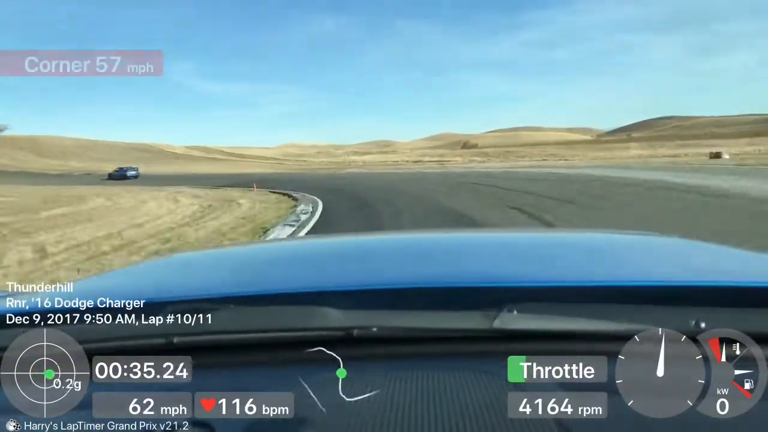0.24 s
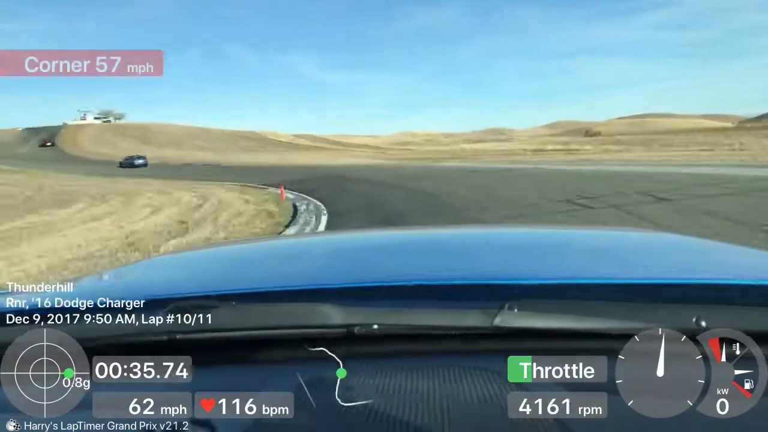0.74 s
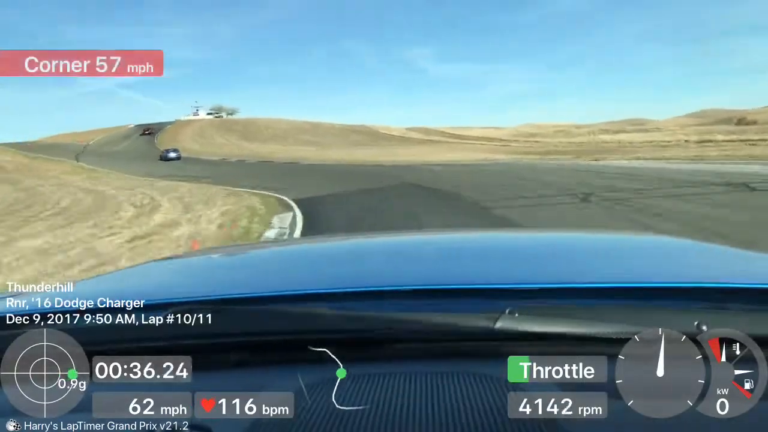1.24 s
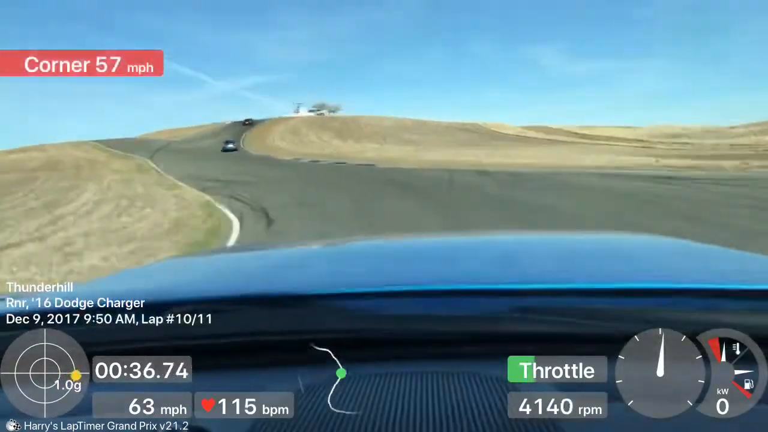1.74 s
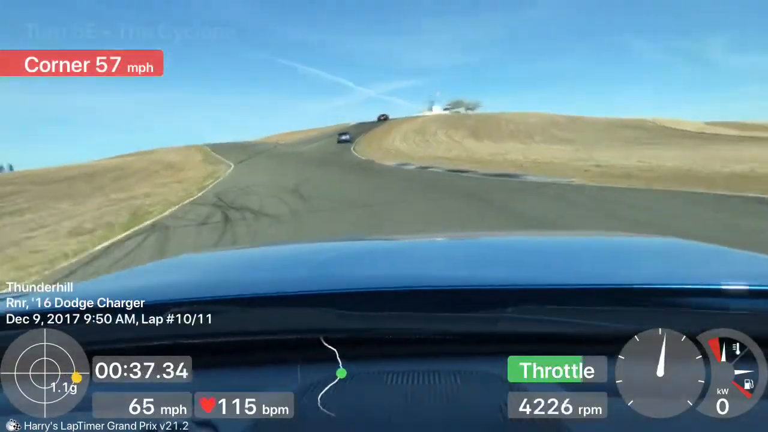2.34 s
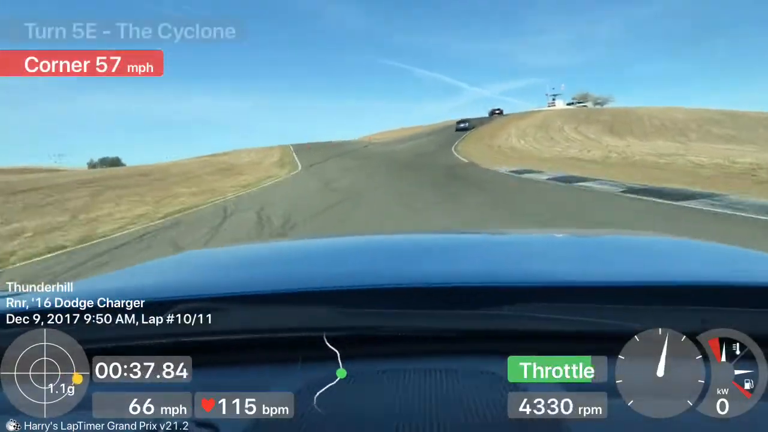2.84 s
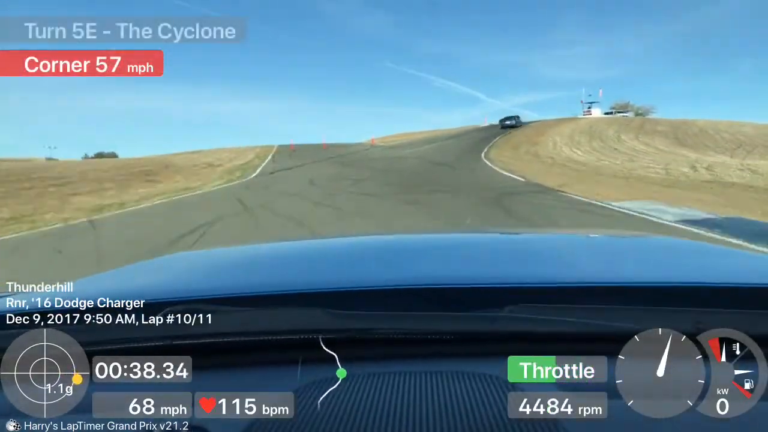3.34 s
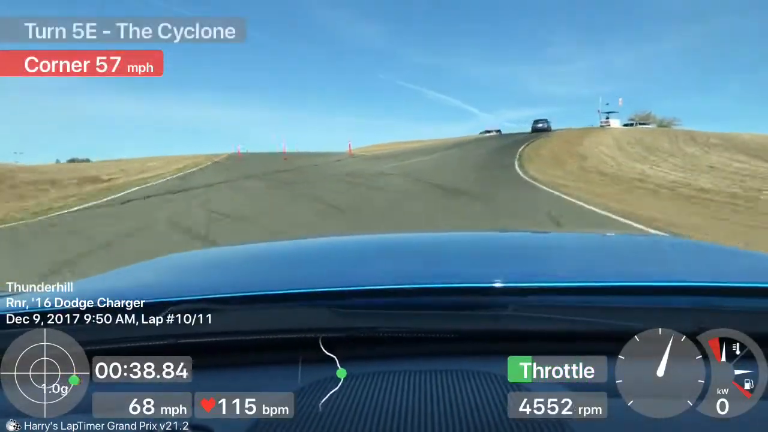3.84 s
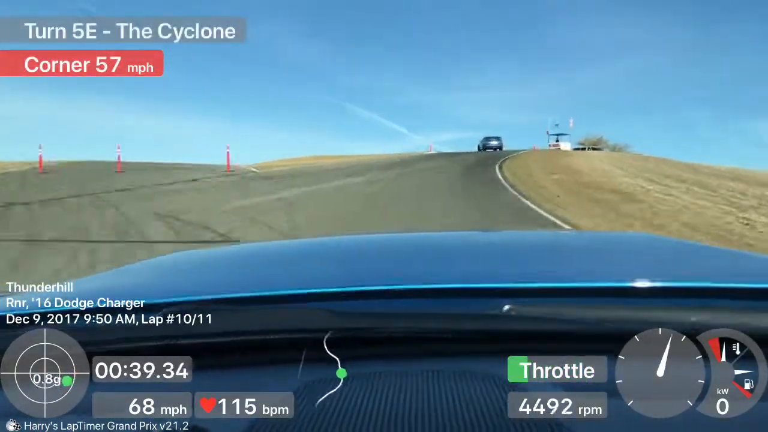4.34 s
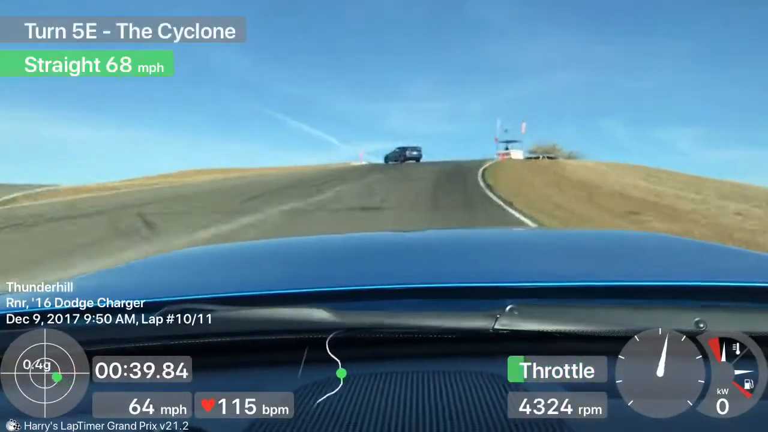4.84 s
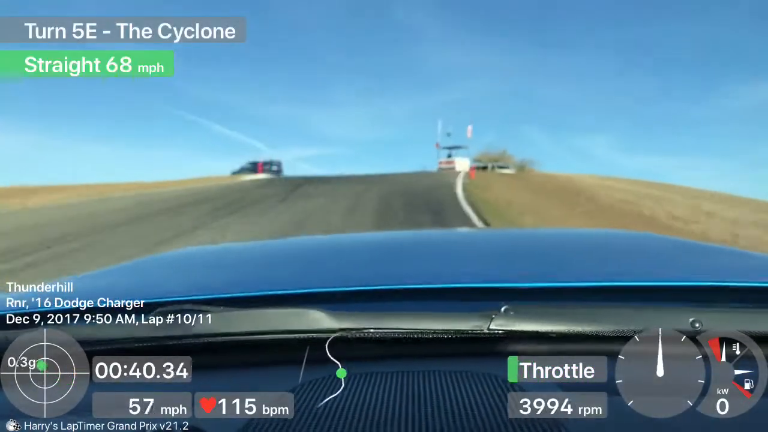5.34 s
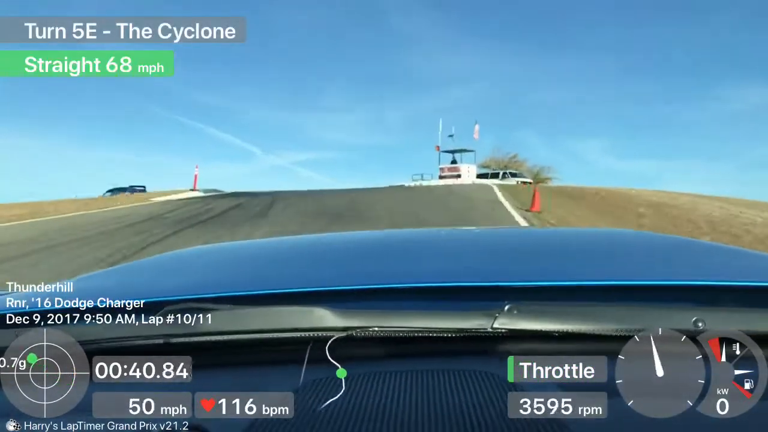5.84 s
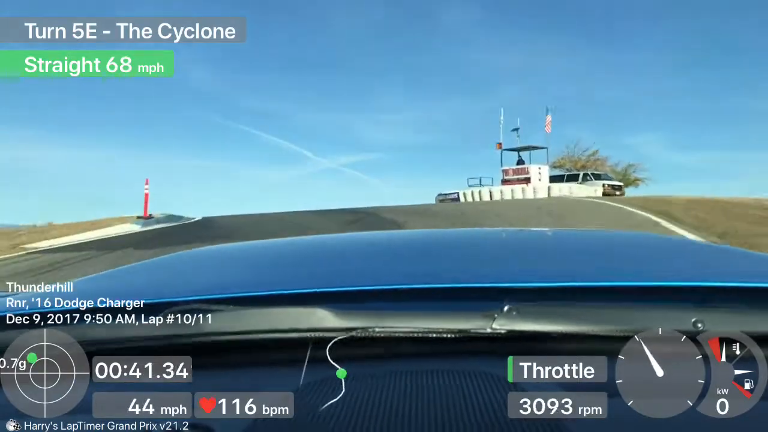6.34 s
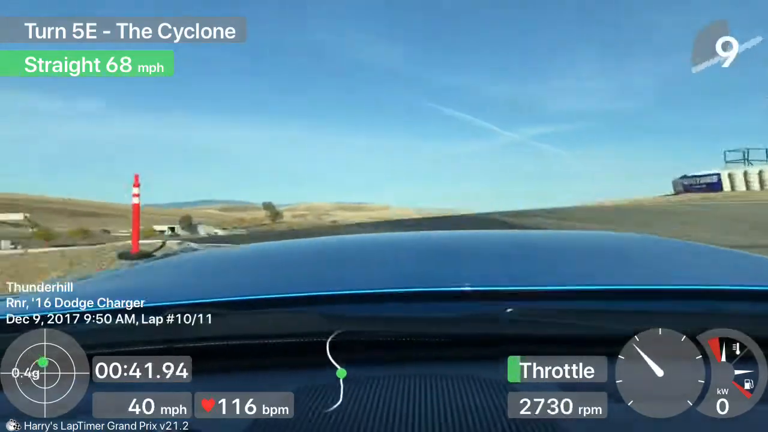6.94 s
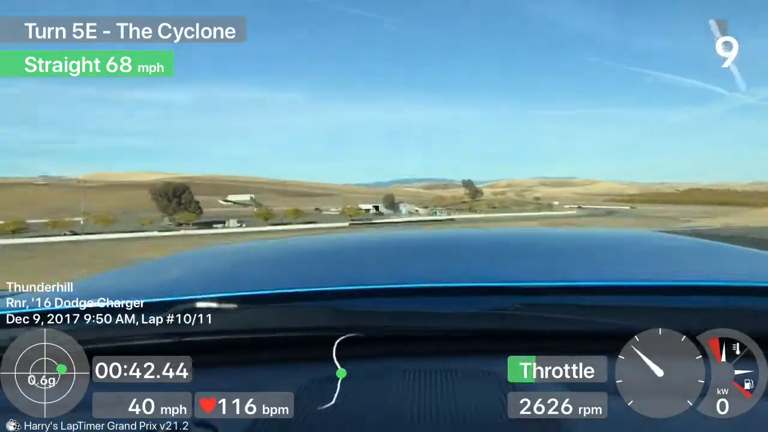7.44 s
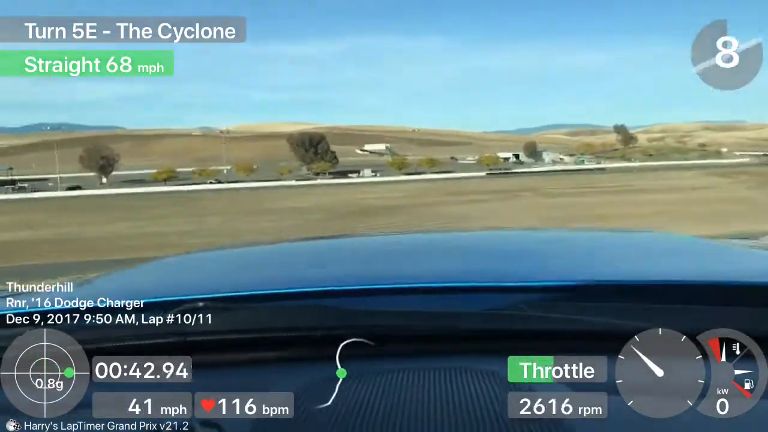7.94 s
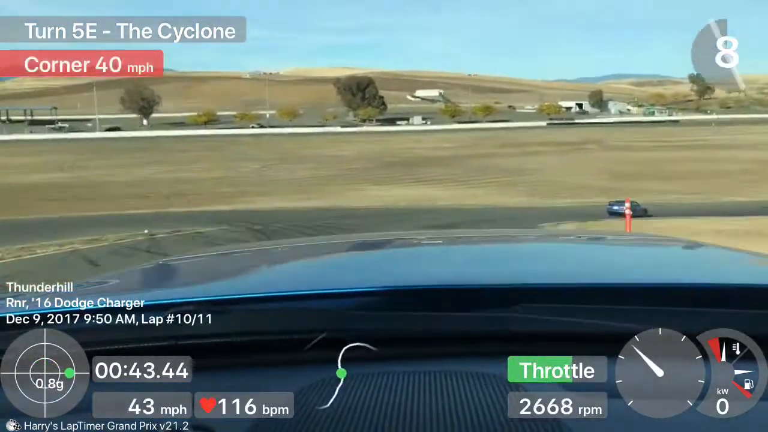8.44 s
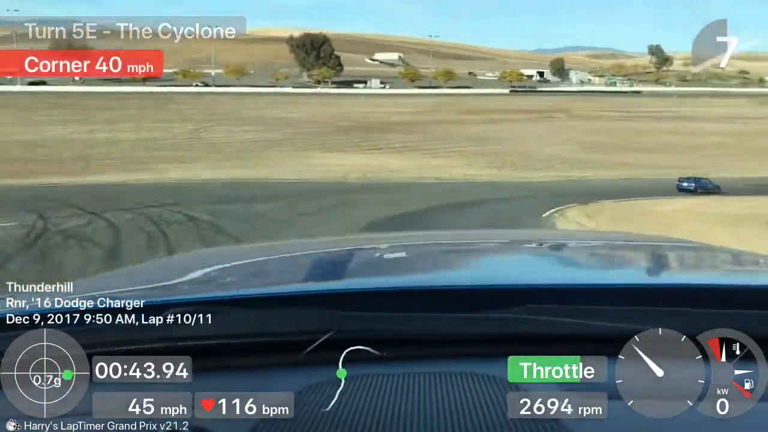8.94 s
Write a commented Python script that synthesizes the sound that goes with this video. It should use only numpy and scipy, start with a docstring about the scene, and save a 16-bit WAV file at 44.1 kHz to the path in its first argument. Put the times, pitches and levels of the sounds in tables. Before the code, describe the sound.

Inside a powerful car cornering hard, the engine booms over road rumble, drops in pitch as the tyres squeal, then pulls again.

```python
"""A supercharged V8 on a race track, from one microphone in the cabin, behind the windscreen.
The car holds speed through a long bend, exhaust barking, rotors whining, tyres scrubbing sideways,
and pulls uphill. At 5 s it brakes: the tread sticks and slips in a squeal, and the body knocks.
From 6 s it takes a slow corner, tyres chirping, the firing pulses booming in the cabin's air modes.
Road rumble and wind surround the microphone throughout; now and then loose plastic trim clicks."""
import sys
import numpy as np
from scipy import signal
from scipy.fft import rfft, irfft, next_fast_len
from scipy.io import wavfile

SR = 44100
rng = np.random.default_rng(int(sys.argv[2]) if len(sys.argv) > 2 else 0)


def dump_mix(stems):
    """Bounce the given channels to the path in sys.argv[1] as a 16-bit WAV at rate SR."""
    frames = np.atleast_2d(stems).T  # one column per channel
    limited = np.clip(frames, -1, 1)  # hard clip at full scale
    pcm = np.round(limited * 32767).astype(np.int16)
    wavfile.write(sys.argv[1], SR, pcm)


N = 405279
TIME = np.arange(N) / SR

# revs, and road speed too, as the car stays in one gear: (time [s], crank speed [turns/s])
REVS = [(0, 68.8), (1.9, 68.9), (2.35, 71.9), (2.96, 77.4), (3.15, 77.6), (3.42, 75.2), (4.5, 74.0),
        (4.8, 72.7), (5.3, 63.2), (5.57, 54.9), (6.0, 49.7), (6.3, 45.4), (6.95, 41.6), (7.2, 43.9),
        (7.5, 43.6), (7.77, 44.8), (7.86, 43.3), (7.95, 44.6), (8.07, 44.2), (8.18, 46.7), (8.55, 46.9),
        (8.7, 48.4), (9.19, 52.5)]
CRUISE = 70  # turns/s, reference speed of the level laws
FLARE_S, FLARE_WIDTH_S, FLARE_TURNS_PER_S = 7.975, 0.07, 6.7  # the driven wheels slip once
# how hard the engine pulls or drags: (time [s], effort [dB])
EFFORT = [(0, 1.5), (1.9, -5.5), (2.25, 2.5), (2.9, -2.5), (3.25, -5), (3.45, -18), (4.5, -9), (4.9, -49),
          (5.3, -43), (5.6, -6.5), (6.15, -2), (6.55, -6.5), (6.92, -7), (6.98, 1.5), (7.3, -2),
          (9.19, -2.5)]
# uneven firing of each bank, strongest on a light throttle: (time [s], level [dB])
BURBLE = [(0, -29.5), (1.0, -32.5), (1.9, -41.5), (2.35, -28), (3.2, -36), (3.5, -24), (3.85, -30.5),
          (4.55, -19.5), (5.1, -48), (6.4, -32), (7.2, -40), (9.19, -42)]
# partials of the engine's voices: (order [multiple of crank speed], level [dB])
FIRING_ORDERS = [(4, -0.5), (5, -42)]
OVERTONE_ORDERS = [(8, -24), (12, -42)]
DRONE_ORDERS = [(3, 1.5), (5, -25), (6, -23), (7.5, -25), (9, -35.5)]
BURBLE_ORDERS = [(1.5, -12.5), (2.5, -3.5), (3, -4), (3.5, -10.5), (4.5, -3), (7, -24), (8.5, -16.5),
                 (12, -22)]
BARK_ORDERS = [(2, 7), (2.5, -3.5), (3, -13), (3.5, -11.5), (5, -5.5), (6, -13.5), (7, 2), (8, -1),
               (8.5, -11), (9, -8), (10, -9), (11.5, -16), (12, -17.5)]
OVERRUN_ORDERS = [(7, -1.5), (6, -12), (2.5, -2)]
# growth of the voices: (base level [dB], with effort [dB/dB], with speed [dB/octave])
FIRING_LAW = (-12, 1.0, 0.1)
DRONE_LAW = (-13, 0.25, 21)
BARK_LAW = (-30, 0.95, 42.5)
OVERRUN_S, OVERRUN_WIDTH_S, OVERRUN_DB = 6.42, 0.28, -33.5  # the exhaust hums, throttle shut
BURBLE_ROUGH, BARK_ROUGH = .14, .19  # depth of the random flutter
CRANK_JITTER_RAD = .02  # stray firing times smear the high orders
# cabin air modes that firing note and drone boom in: (frequency [Hz], gain [dB])
CABIN_BOOM = [(128, -14), (145, -17.5), (158, -8), (168, 1.5), (177, 1), (187, -2), (205, -3.5), (214, -11),
              (224, -20.5), (245, -42), (275, -34), (291, -21.5), (301, -9.5), (309, -2.5), (330, -14)]
# cabin resonances that colour the rough orders: (frequency [Hz], gain [dB])
CABIN_PATH = [(60, -10), (100, -23.5), (140, -8), (155, 0.5), (200, 3.5), (250, -11.5), (315, 0), (345, -5),
              (384, -7.5), (405, -15.5), (440, -17.5), (500, -9), (545, -9.5), (572, -17), (610, -5.5),
              (650, -3.5), (720, -8), (800, -4.5), (1500, -10)]

LOBE_PASSES_PER_TURN = 11.67
# supercharger whine: (harmonic [multiple of lobe rate], level [dB])
WHINE_TONES = [(1, 2), (2, 0), (3, -2), (4, -4), (5, -8), (6, -10.5)]
# through the bulkhead to the microphone: (frequency [Hz], gain [dB])
WHINE_PATH = [(480, 14), (515, 14), (620, 15), (780, -10), (1150, -5), (1750, -17), (2400, -12),
              (2700, -5.5), (2880, -4), (3150, 1.5), (3350, -3.5), (3530, -5), (3650, -7.5), (3850, -26.5)]
# spells of boost: (start of rise [s], start of fall [s], level [dB])
BOOSTS = [(.2, 1.95, -52), (2.4, 3.16, -51), (7.25, 7.6, -59.5), (8.45, 9.15, -61.5)]

# tyre squeal, one table a slide: (time [s], pitch [Hz], level [dB], pitch wander [share])
SQUEALS = [
    [(.05, 522.4, -55, 0.034), (.3, 509.6, -45, 0.016), (.48, 513.4, -32.5, 0.021), (.9, 520, -33, 0.018),
     (1.25, 515.5, -38.5, 0.024), (1.7, 518, -34, 0.018), (2.0, 510, -45, 0.021)],
    [(5.02, 486, -38, 0.021), (5.12, 510.5, -35.5, 0.016), (5.21, 510.5, -30, 0.011),
     (5.28, 532, -29.5, 0.01), (5.32, 555.5, -24, 0.014), (5.342, 576, -27.5, .02), (5.37, 605, -21, 0.011),
     (5.48, 601.4, -21.5, 0.005), (5.535, 597, -26.5, .01), (5.57, 566, -50, 0.02)],
]
# its partials: (harmonic [number], level in a full slide [dB], growth with squeal level [dB/dB])
SQUEAL_TONES = [(1, 0, 0), (2, -6, .7), (3, -27, .5), (4, -24, .5), (5, -29, .7)]
# rasp of sliding rubber: (frequency [Hz], level [dB])
SKID_COLOUR = [(300, -20), (700, 6), (1000, -4), (1300, 3), (1600, 4), (1830, -7.5), (2350, 0),
               (2700, -9.5), (3050, -5.5), (3600, -15), (5500, -19), (9000, -43)]
# tyre chirps in the slow corner: (time [s], half length [s], pitch [Hz], level [dB])
CHIRPS = [(7.068, .024, 1140, -27.5), (7.15, .022, 1112, -33.5), (7.15, .012, 1260, -38),
          (7.212, .022, 1130, -39), (7.258, .022, 622, -36), (7.34, .02, 1165, -37),
          (7.548, .024, 1145, -38), (7.592, .02, 1165, -39), (7.688, .02, 1115, -39.5),
          (8.02, .035, 790, -42.5), (8.09, .03, 1175, -47), (8.16, .018, 1180, -46)]
# scrub, front and rear in the bend, in the slow corner, singing between chirps: (time [s], level [dB])
SCRUB_FRONT = [(0, -51), (.3, -41), (.42, -32.5), (.65, -34), (.85, -33), (1.3, -33.5), (1.8, -39),
               (2.0, -46), (2.6, -48), (3.3, -72)]
SCRUB_REAR = [(0, -52), (.5, -42.5), (1.05, -35.5), (1.45, -36.5), (1.76, -35), (1.95, -49), (2.6, -48),
              (3.3, -74)]
SCRUB_SLOW = [(6.4, -79), (6.75, -42), (7.12, -38), (7.45, -42), (7.65, -43), (7.85, -46), (8.15, -46),
              (8.45, -55.5), (9.19, -51.5)]
SCRUB_SING = [(6.9, -54), (7.02, -44), (7.06, -36.5), (7.15, -38.5), (7.27, -41), (7.4, -41.5), (7.49, -47),
              (7.55, -45), (7.72, -43.5), (7.8, -58.5), (8.03, -60), (8.09, -52), (8.25, -57.5),
              (8.38, -54), (8.5, -65), (8.82, -56), (9.0, -73)]
# tread resonances of each scrub: (frequency [Hz], width [Hz], relative level [dB])
TREAD_FRONT = [(1025, 48, 1.5), (1275, 130, -4), (2260, 330, -9.5), (2820, 110, -11), (3325, 550, -19),
               (4370, 470, -18), (5300, 700, -23.5)]
TREAD_REAR = [(1127, 50, 1.5), (1325, 120, -9.5), (2310, 300, -13), (2786, 135, -14.5), (4280, 380, -20.5),
              (5270, 800, -28)]
TREAD_SLOW = [(622, 70, 2.5), (765, 100, 0.5), (904, 70, -3.5), (1110, 250, -2), (1370, 100, -6),
              (2090, 600, -11.5), (2750, 160, -21.5), (4400, 700, -28)]
TREAD_SING = [(1132, 64, 4), (1264, 92, -9), (2290, 300, -17), (2770, 180, -19), (4800, 920, -28)]

# limits of the road's bands, rumble, body boom, tyre roar, wind and hiss: (frequency [Hz])
ROAD_EDGES = [20, 90, 400, 1500, 5000, 15500]
# growth of each band: (base level [dB], with grind [dB/dB], with speed [dB/octave])
ROAD_LAWS = [(-22, 0.62, 15.5), (-25, .5, 11.5), (-33, 1.13, 9.5), (-45, 1.0, 15), (-55, 0.77, 17.5)]
# road and wind as heard inside: (frequency [Hz], level [dB])
ROAD_COLOUR = [(18, -12.5), (42, 5.5), (66, 5.5), (84, -3.5), (105, -3.5), (140, -3.5), (195, -0.5),
               (250, -13), (335, -13.5), (400, -19.5), (450, -25), (590, -23.5), (700, -21.5),
               (1250, -30.5), (1800, -32.5), (3700, -40), (8000, -54), (15500, -60.5)]
# body panel resonances: (frequency [Hz], width [Hz], lift [dB])
PANELS = [(815, 40, -3.5), (970, 50, -1.5), (1286, 31, 4), (1555, 22, 5), (1955, 42, 7.5), (2277, 370, 7),
          (2460, 130, 4.5), (2798, 130, 6), (3020, 220, 5.5), (4450, 260, 1), (5540, 980, 1),
          (12400, 1400, 2.5)]
# how harshly the tyres work on the asphalt: (time [s], grind [dB])
GRIND = [(0, 3), (.25, 2), (.8, 3), (1.65, 0.7), (2.0, -1), (2.4, -3.5), (2.7, -1), (3.1, -7), (3.7, -6),
         (4.35, -0.5), (5.2, 1), (5.7, -2), (6.35, -3.5), (6.6, 2), (7.05, 2.5), (7.5, -4), (8.55, -12),
         (9.19, -8)]
# bumps and dips in the track: (time [s], half length [s], rumble lift [dB], boom lift [dB])
BUMPS = [(0.098, 0.04, 2.5, 7.5), (0.95, 0.13, 1.5, 1.5), (2.647, 0.35, 1, 3), (4.08, 0.076, 3, 2.5),
         (4.56, 0.1, 2.5, 3.5), (4.766, 0.093, -2, 4), (5.35, 0.42, 5.5, 6.5), (5.792, 0.39, 6.5, 5.5),
         (6.299, 0.16, 7.5, 4), (6.963, 0.23, 10, 8), (7.713, 0.068, 9, -5.5), (8.298, 0.088, 7, 3),
         (9.06, .08, -2, 4)]

# jolts of the body: (time [s], pitch [Hz], level [dB], decay t60 [s])
KNOCKS = [(5.051, 76.2, -9, 0.57), (5.123, 64, -11, 0.79), (6.555, 454, -22, 0.056),
          (9.019, 1115, -32.5, 0.058)]
# trim clicks: (time [s], level [dB], decay t60 [s], treble tilt [dB/octave])
CLICKS = [(4.3, -27.5, 0.046, 9), (4.302, -33, 0.04, -5), (4.341, -37, 0.09, 4), (6.506, -44, 0.06, 1),
          (6.614, -28, 0.047, 6.5), (6.617, -26, .05, -1), (6.634, -32.5, 0.11, -0.5),
          (9.012, -37, 0.045, 6), (9.015, -39, 0.035, -2), (9.021, -41, 0.07, -1.5), (9.06, -47.5, 0.08, 0)]
# ring of the plastic: (frequency [Hz], level [dB])
TRIM_COLOUR = [(300, -27), (1100, -0.5), (1500, -5), (2000, 17.5), (2700, 5), (4500, 2.5), (8000, -10),
               (13000, -16.5), (16000, -20.5)]
# fine rustles as the car slows: (time [s], half length [s], level [dB])
RUSTLES = [(5.8, .04, -61), (6.105, 0.095, -65.5), (6.4, .6, -66), (7.083, .04, -71.5),
           (7.846, 0.073, -71.5)]


def engine(angle, speed):
    """Firing note (four pulses a turn) and drone (three) boom in the cabin, amid burble and bark."""
    effort = follow(EFFORT)[0]
    firing_db = law(FIRING_LAW, effort, speed) + read(CABIN_BOOM, 4 * speed)
    drone_db = law(DRONE_LAW, effort, speed) + read(CABIN_BOOM, 3 * speed)
    pulses = clean_orders(angle, FIRING_ORDERS)
    overtones = rough_orders(angle, speed, OVERTONE_ORDERS, BURBLE_ROUGH)
    firing = amp(firing_db) * (pulses + overtones) * (1 + 0.046 * wander(36))
    drone = amp(drone_db) * clean_orders(angle, DRONE_ORDERS) * (1 + 0.025 * wander(27))
    burble = amp(follow(BURBLE)[0]) * rough_orders(angle, speed, BURBLE_ORDERS, BURBLE_ROUGH)
    bark = bark_gain(speed) * rough_orders(angle, speed, BARK_ORDERS, BARK_ROUGH)
    overrun_gain = amp(OVERRUN_DB) * swell(OVERRUN_S, OVERRUN_WIDTH_S)
    overrun = overrun_gain * clean_orders(angle, OVERRUN_ORDERS) * (1 + .2 * wander(10))
    return firing + drone + burble + bark + overrun


def clean_orders(angle, table):
    """Crank orders: the first listed is steady, the others stray with the firings."""
    main = table[0][0]
    out = 0
    for order, db in table:
        stray = 2 * (order - main) * CRANK_JITTER_RAD * wander(20)
        out += amp(db) * np.cos(order * angle + stray + 2 * np.pi * rng.random())
    return np.sqrt(2) * out


def rough_orders(angle, speed, table, rough):
    """Crank orders shaken by uneven combustion; each swells as it crosses a cabin resonance."""
    out = 0
    for order, db in table:
        # whole orders keep loosely in step: a soft thud each turn
        lag = rng.standard_normal() * (np.pi if order % 1 else .8)
        shake = 1 + rough * wander(6.6)
        phase = order * (angle + CRANK_JITTER_RAD * wander(25)) + lag
        out += amp(db + read(CABIN_PATH, order * speed)) * shake * np.cos(phase)
    return np.sqrt(2) * out


def bark_gain(speed):
    """The exhaust barks under load at high revs."""
    return amp(law(BARK_LAW, follow(EFFORT)[0], speed))


def supercharger(angle, speed, rise_s=0.27, fall_s=0.59, flicker=.3):
    """Beyond the bulkhead, belt-driven rotors whine under boost; only some pitches pass well."""
    lobe_angle = LOBE_PASSES_PER_TURN * angle + 0.2 * wander(25)  # the belt flutters
    whine = boost = 0
    for k, db in WHINE_TONES:
        gain = amp(db + read(WHINE_PATH, k * LOBE_PASSES_PER_TURN * speed))
        whine += gain * (1 + flicker * wander(7.3)) * np.cos(k * lobe_angle)
    for start, end, db in BOOSTS:
        ramp = np.minimum((TIME - start) / rise_s, 1 - (TIME - end) / fall_s)
        boost += amp(db) * np.clip(ramp, 0, 1)
    return boost * np.sqrt(2) * whine


def squeal(slide, full_slide_db=-19, rasp_db=-12):
    """Tread sticks and slips over a rasp of sliding rubber; overtones come with a full slide."""
    hz, db, unsteady = follow(slide)
    phase = 2 * np.pi * np.cumsum(hz * (1 + unsteady * wander(45))) / SR
    voice = 0
    for k, level, growth in SQUEAL_TONES:
        gain = amp(level + growth * (db - full_slide_db))
        voice += gain * (1 + 0.1 * k * wander(50)) * np.cos(k * phase)
    size = next_fast_len(N)
    rasp = noise(amp(read(SKID_COLOUR, np.fft.rfftfreq(size, 1 / SR))), size)
    sliding = (TIME > slide[0][0]) & (TIME < slide[-1][0])
    return sliding * amp(db) * (unit(amp(2 * wander(25)) * voice) + amp(rasp_db) * rasp)


def chirps(octave_db=-22.5):
    """Single tread blocks grip and let go in short, raspy notes."""
    out = np.zeros(N)
    waver, flutter = 1 + .013 * wander(70), amp(1.8 * wander(90))
    for s, width, hz, db in CHIRPS:
        near = abs(TIME - s) < 3 * width
        phase = 2 * np.pi * np.cumsum(hz * waver[near]) / SR
        note = np.sin(phase) + amp(octave_db) * np.sin(2 * phase)
        out[near] += amp(db) * swell(s, width)[near] * note
    return np.sqrt(2) * flutter * out


def scrub(levels, tread, waver=.011, flutter_db_per_khz=1.2, hold=.4):
    """Sideways slip rings the tread in fuzzy resonances; the high ones rasp in bursts."""
    phase_per_hz = 2 * np.pi * (TIME + waver * np.cumsum(wander(9.04)) / SR)
    flutter = flutter_db_per_khz * wander(15)
    ring = 0
    for hz, width, db in tread:
        swing = wander(width / 2) + 1j * wander(width / 2)
        tone = (swing * np.exp(1j * hz * phase_per_hz)).real
        friction = (1 + abs(swing) ** 2) ** (hold / 2)  # evens out the swing
        ring += amp(db) * unit(amp(flutter * hz / 1000) * tone / friction)
    return amp(follow(levels)[0]) * unit(ring)


def road(angle, exhaust_db=-38):
    """Road and wind come through the panels; under load the middle bands throb with the exhaust."""
    size = next_fast_len(N)
    hz = np.fft.rfftfreq(size, 1 / SR)
    panels_db = sum(db * np.exp(-(2 * (hz - f) / width) ** 2) for f, width, db in PANELS)
    colour = amp(read(ROAD_COLOUR, hz) + panels_db) * hz ** 2 / (hz ** 2 + 16 ** 2)
    speed, grind = follow(REVS)[0], follow(GRIND)[0]
    bands = []
    for lo, hi in zip(ROAD_EDGES, ROAD_EDGES[1:]):
        passband = 1 / np.sqrt((1 + (lo / (hz + 1)) ** 10) * (1 + (hz / hi) ** 10))
        bands.append(noise(colour * passband, size))
    gains = [amp(law(rule, grind, speed)) for rule in ROAD_LAWS]
    rumble, boom, roar, wind, hiss = np.multiply(gains, bands)
    rumble *= amp(sum(db * swell(s, width) for s, width, db, _ in BUMPS))
    boom *= amp(sum(db * swell(s, width) for s, width, _, db in BUMPS))
    load = bark_gain(speed) / amp(BARK_LAW[0])
    roar += amp(exhaust_db) * load * bands[2][::-1]  # rush of exhaust gas
    beats = unit(sum(np.cos(k * angle + 2 * np.pi * rng.random()) for k in (.5, 1, 1.5, 2, 4)))
    throb = 1 + 0.1 * load * beats
    gusts = amp(0.98 * wander(25))
    return rumble + boom + gusts * (throb * (roar + wind) + hiss)


def knocks(rise_s=0.0041):
    """Jolts of the body leave a dull, short ring in the cabin."""
    out = np.zeros(N)
    for s, hz, db, t60 in KNOCKS:
        age = np.maximum(TIME - s, 0)
        envelope = amp(db - 60 * age / t60) * (1 - np.exp(-age / rise_s))
        out += envelope * np.sqrt(2) * np.sin(2 * np.pi * hz * age)
    return out


def trim(rise_s=0.0012):
    """Close by, loose plastic chatters in short dense bursts, then settles."""
    out = np.zeros(N)
    age = TIME[:SR // 4]
    hz = np.fft.rfftfreq(len(age), 1 / SR)
    for s, db, t60, tilt in CLICKS:
        burst = noise(amp(read(TRIM_COLOUR, hz) + tilt * np.log2(hz + 1)), len(age))
        envelope = amp(db - 60 * age / t60) * (1 - np.exp(-age / rise_s))
        part = out[round(s * SR):][:len(age)]
        part += (burst * envelope)[:len(part)]
    return out


def rustle(low_hz=8000):
    """A faint grainy rustle high in the treble."""
    grains = rng.standard_normal(N) * amp(1.8 * wander(120))
    gain = sum(amp(db) * swell(s, width) for s, width, db in RUSTLES)
    highpass = signal.butter(2, low_hz, "high", fs=SR, output="sos")
    return gain * unit(signal.sosfilt(highpass, grains))


def amp(db):
    """Decibels to gain."""
    return 10 ** (np.asarray(db) / 20)


def unit(x):
    """Scales to rms 1."""
    return x / np.sqrt(np.mean(x ** 2) + 1e-20)


def follow(rows):
    """The columns of a time table at every sample."""
    s, *columns = np.transpose(rows)
    return [np.interp(TIME, s, c) for c in columns]


def read(points, hz):
    """A spectrum table in dB at the frequencies hz."""
    f, db = np.transpose(points)
    return np.interp(np.log(hz + 1), np.log(f + 1), db)


def law(rule, drive_db, speed):
    """Level in dB of a sound that grows with its drive and with speed."""
    db, per_drive, per_octave = rule
    return db + per_drive * drive_db + per_octave * np.log2(speed / CRUISE)


def swell(s, width):
    """A smooth rise and fall of height 1 around the time s."""
    return np.exp(-((TIME - s) / width) ** 2)


def noise(colour, size):
    """Noise of rms 1 with the spectrum colour, at most N samples long."""
    return unit(irfft(rfft(rng.standard_normal(size)) * colour, size)[:N])


def wander(hz):
    """Smooth random drift of rms 1, no faster than about hz."""
    step = 16
    size = next_fast_len(N // step + 2)
    f = np.fft.rfftfreq(size, step / SR)
    slow = irfft(rfft(rng.standard_normal(size)) * np.exp(-.5 * (f / hz) ** 2), size)
    return unit(np.interp(TIME, np.arange(size) * step / SR, slow))


def scene():
    """Engine, tyres, road and trim at one microphone behind the windscreen."""
    speed = follow(REVS)[0] + FLARE_TURNS_PER_S * swell(FLARE_S, FLARE_WIDTH_S)
    angle = 2 * np.pi * np.cumsum(speed) / SR
    long_bend = scrub(SCRUB_FRONT, TREAD_FRONT) + scrub(SCRUB_REAR, TREAD_REAR)
    slow_corner = scrub(SCRUB_SLOW, TREAD_SLOW) + scrub(SCRUB_SING, TREAD_SING)
    tyres = long_bend + slow_corner + sum(squeal(slide) for slide in SQUEALS) + chirps()
    rattles = trim() + rustle() + knocks()
    return (engine(angle, speed) + supercharger(angle, speed) + tyres + road(angle) + rattles)[None]


def record(dry):
    """The recorder cuts off the highest treble."""
    edge_hz = 15850
    lowpass = signal.firwin(511, edge_hz, window=("kaiser", 9), fs=SR)
    padded = np.pad(dry, ((0, 0), (255, 255)), mode="reflect", reflect_type="odd")
    return signal.oaconvolve(padded, lowpass[None], "valid", axes=1)


dry = scene()
out = record(dry)
dump_mix(out)
```